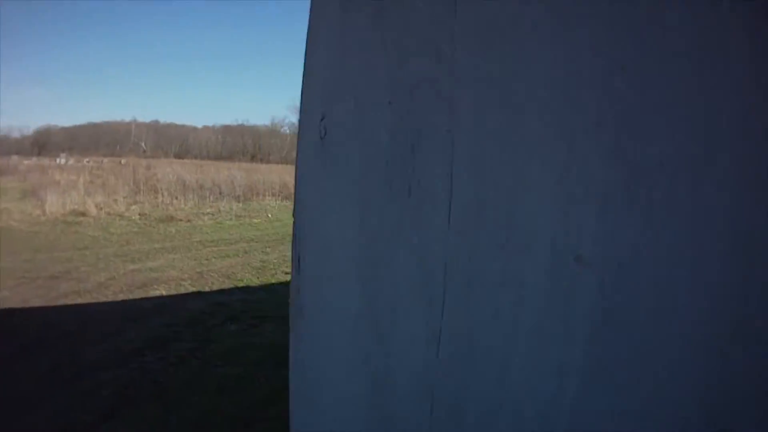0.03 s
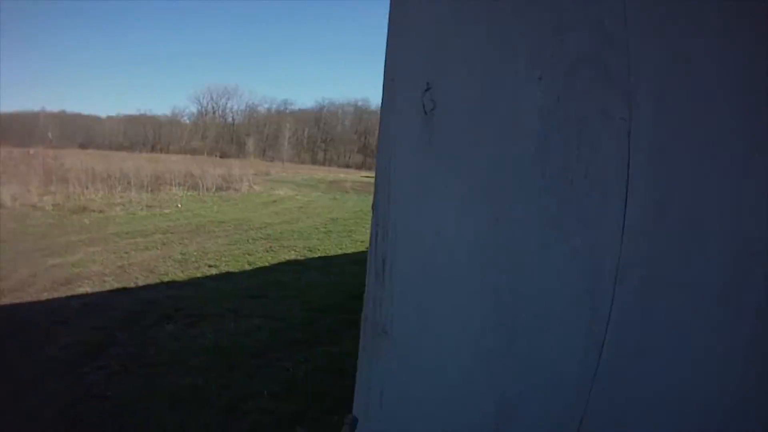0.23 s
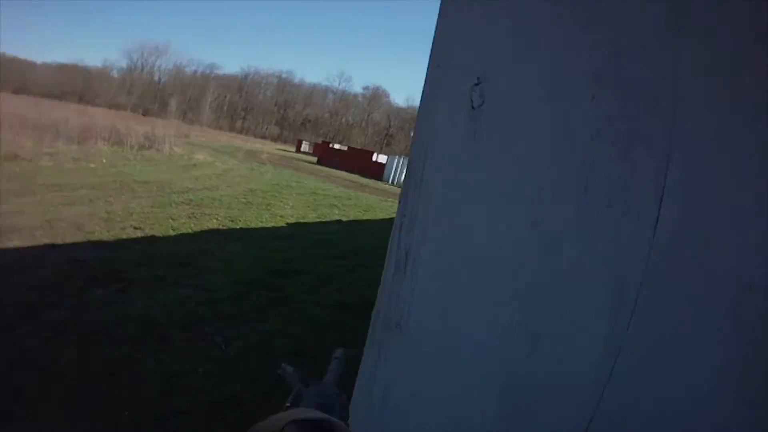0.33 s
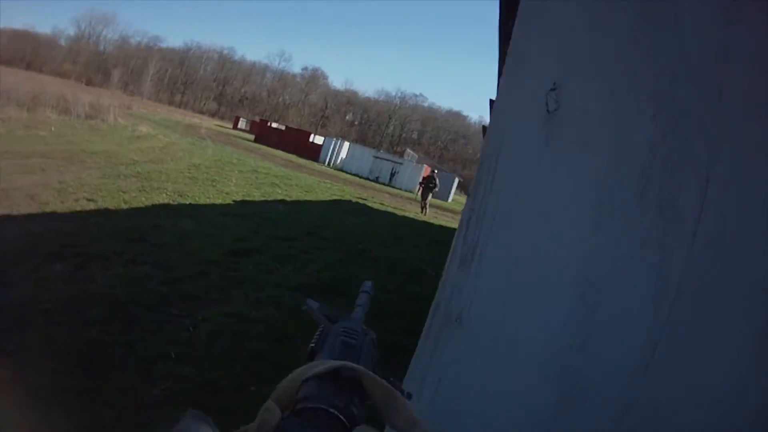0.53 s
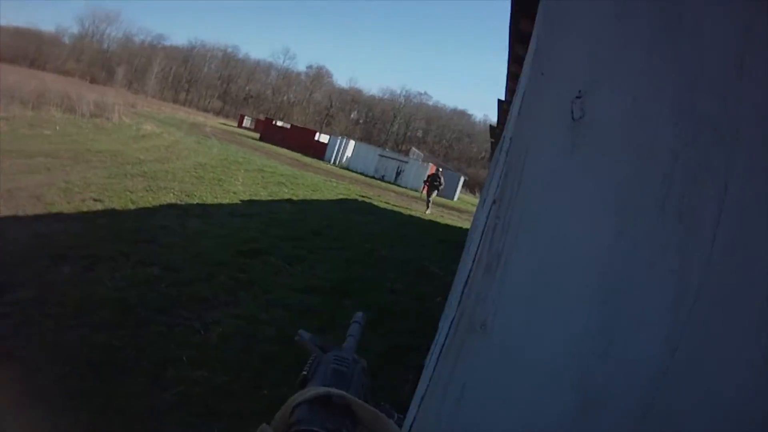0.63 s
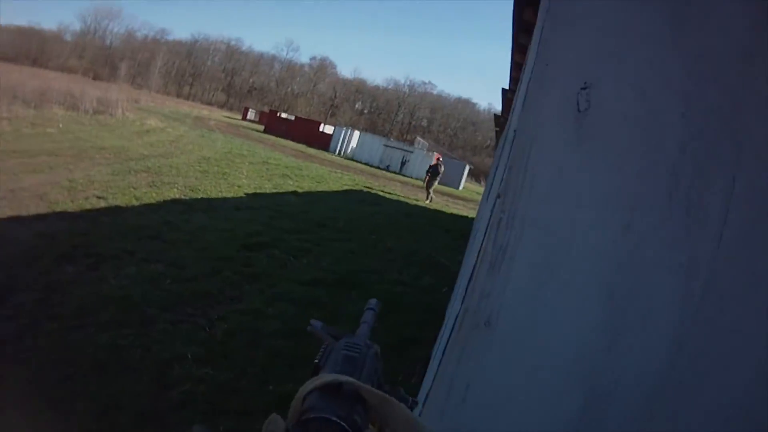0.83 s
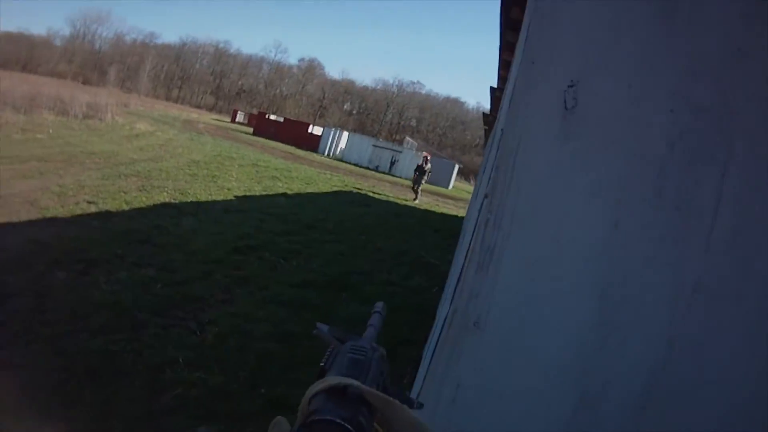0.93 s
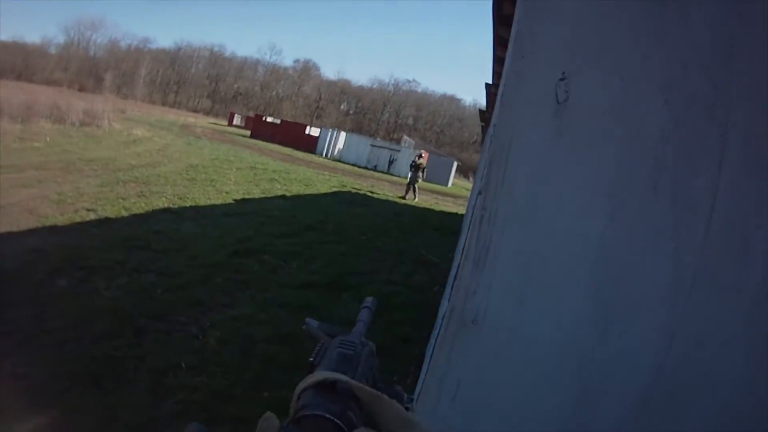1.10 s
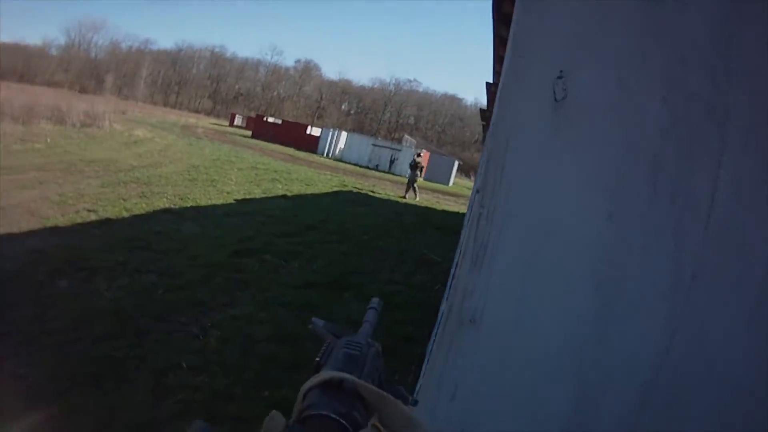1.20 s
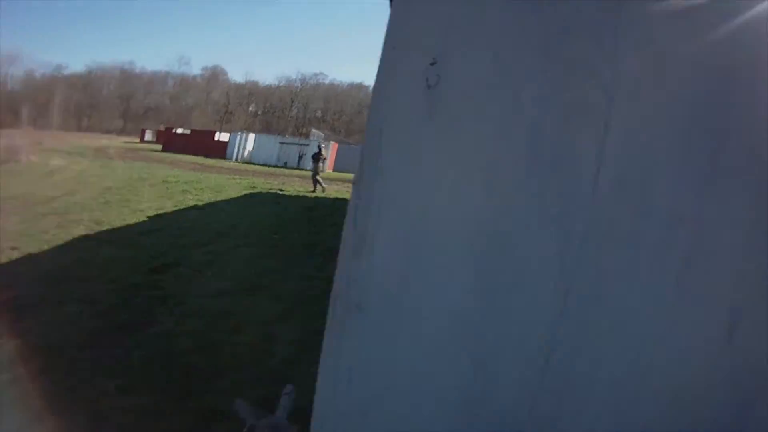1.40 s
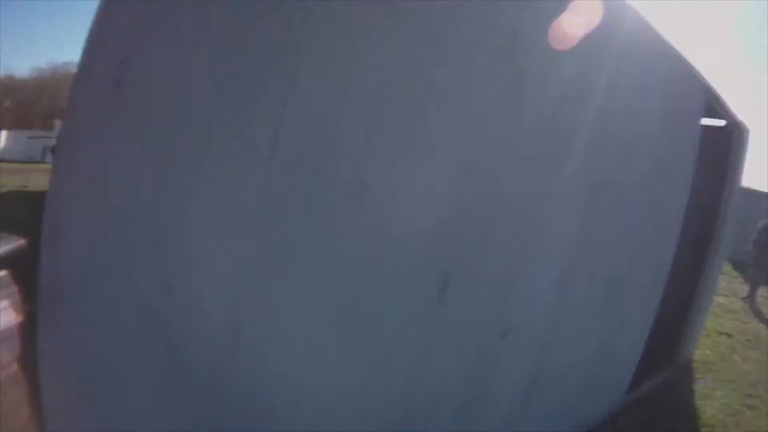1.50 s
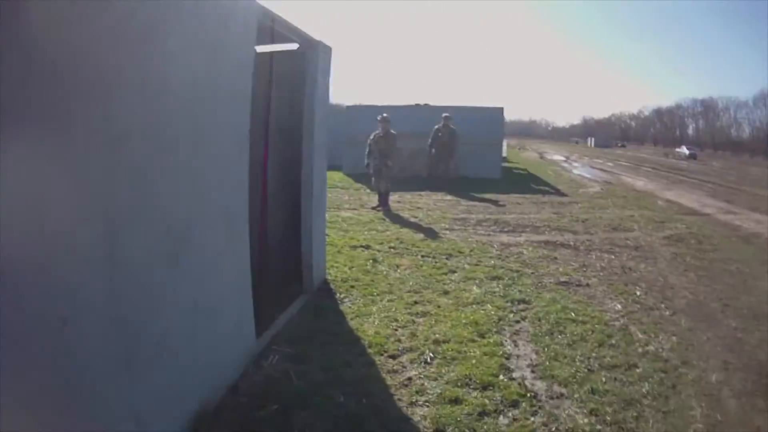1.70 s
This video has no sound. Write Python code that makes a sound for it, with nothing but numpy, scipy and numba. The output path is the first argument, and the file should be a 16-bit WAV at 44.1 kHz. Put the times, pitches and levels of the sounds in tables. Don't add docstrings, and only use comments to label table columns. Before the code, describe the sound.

Electric airsoft rifle fires six quick, even shots up close outdoors, after gear rustles and knocks

```python
import sys
import numpy as np
from scipy import signal
from scipy.io import wavfile
from scipy.ndimage import uniform_filter1d
from numba import njit

SR = 44100
rng = np.random.default_rng(int(sys.argv[2]) if len(sys.argv) > 2 else 0)


def transcribe(u):
    v = np.clip(np.atleast_2d(u).T, -1, 1)
    q = np.round(v * 32767).astype(np.int16)
    wavfile.write(sys.argv[1], SR, q)


def invert_db(x):
    u = np.asarray(x, float) / 20
    return 10 ** u


N = 77175

# motor starts t/s, gear catches t/s, nozzle clicks t/s, piston released t/s, piston slams t/s
CYCLES = [(.497, .5255, .5535, .6015, .6118), (.660, .685, .7128, .759, .7645),
          (.803, .8275, .8552, .8995, .9061), (.950, .9722, 1.0001, 1.045, 1.0513),
          (1.078, 1.1029, 1.1286, 1.171, 1.1777), (1.222, 1.2446, 1.273, 1.318, 1.3238)]
TICK_COLOUR = [-43, -54, -38, -22, -46, -1.5, -2.5, 0.5, -13, -8, -25, -17.5]


def level(x, db):
    return x * invert_db(db) / np.sqrt(np.mean(x ** 2))


@njit
def svf(x, hz, width):
    y, band, low = np.empty(len(x)), 0., 0.
    g, damping = np.tan(np.pi * hz / SR), width / hz
    for i in range(len(x)):
        v = (band + g * (x[i] - low)) / (1 + g * (g + damping))
        band, low = 2 * v - band, low + 2 * g * v
        y[i] = damping * v
    return y


def high_pass(x, order, hz):
    return signal.sosfilt(signal.butter(order, hz, "high", fs=SR, output="sos"), x)


def walk(rate):
    hold = int(SR / rate)
    steps = np.repeat(rng.standard_normal(N // hold + 1), hold)
    return 1.52 * uniform_filter1d(uniform_filter1d(steps, hold), hold)[:N]


def grit(spread_db, rate):
    x = rng.standard_normal(N) * invert_db(spread_db * walk(rate))
    return x / np.std(x)


def bursts(t, times, dbs, lengths):
    return sum(invert_db(db) * (t >= s) * np.exp(-np.abs(t - s) / length)
               for s, db, length in zip(times, dbs, lengths))


def ring(t, times, dbs, modes):
    out = np.zeros(N)
    for s, db in zip(times, dbs):
        for late, hz, mode_db, t60, push in modes:
            age = np.clip(t - s - late, 0, .2)
            decay = invert_db(db + mode_db - 60 * age / abs(t60))
            onset = 1 - np.exp(-age / abs(push))
            detuned = hz * (1 + 0.017 * rng.standard_normal())
            out += decay * onset * np.sin(2 * np.pi * detuned * age) * (age < .2)
    return out


def case(x, tone_db):
    # f/Hz, width/Hz
    resonances = [(200, 257), (560, 245), (950, 245), (1400, 356), (1950, 580), (2600, 400), (3300, 560),
                  (3950, 660), (5050, 630), (6800, 940), (8500, 1300), (11500, 7700)]
    out = 0
    for k, ((hz, width), db) in enumerate(zip(resonances, tone_db)):
        gain = (-1) ** k * invert_db(db) * np.sqrt(SR / 2 / width)
        once = svf(x, float(hz), 1.44 * width)
        out = out + gain * svf(once, float(hz), 1.44 * width)
    return out


def field():
    hush_colour = [3.5, 3.5, -10, -12, -6.5, -8, -8, -29, -18, -5, -26, -6.5]
    early = level(svf(grit(1.5, 20), 170.0, 110.0), -50) * np.exp(-(np.arange(N) / SR / .2) ** 2)
    hush = level(case(grit(3.2, 30.5), hush_colour), -46.5)
    wind = level(svf(grit(1.4, 7.6), 80.0, 78.0), -58.5)
    return early + hush + wind


def kit(t):
    # t/s, peak level/dB, length/s
    tick_events = [(0.015, -28.5, 0.0024), (0.086, -26, 0.0018), (0.0903, -31, 0.0036),
                   (0.125, -29, 0.00084), (0.192, -26, 0.0051), (0.291, -23, 0.0032), (0.954, -9, 0.0028),
                   (1.23, -13.5, 0.002), (1.397, -34, 0.0013), (1.411, -26, 0.005), (1.4608, -25, 0.0034),
                   (1.544, -31, 0.0011), (1.553, -35, .0015), (1.598, -36, 0.002), (1.6136, -33.5, 0.0023)]
    # t/s, level/dB
    rub = [(0, -47), (.05, -46), (.065, -38.5), (0.091, -53.5), (.24, -46), (0.268, -33.5), (.32, -31),
           (.40, -34), (.46, -42), (1.36, -47.5), (1.45, -45), (1.68, -46.5), (1.72, -39), (1.75, -33.5)]
    rub_colour = [-1.5, 2, -20.5, -4.5, -16, -2, -7.5, -0.5, -12, -8.5, -18.5, -15.5]
    # t/s, half length/s, f/Hz, level/dB
    squeak_events = [
        (0.313, 0.01, 2200, -32),
        (1.725, 0.012, 2300, -38.5),
        (0.605, 0.067, 240, -37),
    ]
    times, peaks, lengths = np.array(tick_events).T
    tick_noise = bursts(t, times, peaks, np.abs(lengths)) * rng.standard_normal(N)
    ticks = invert_db(-8.5) * case(tick_noise, TICK_COLOUR)
    rub_s, rub_db = np.array(rub).T
    rustle = level(case(grit(2.24, 250), rub_colour), 0) * invert_db(np.interp(t, rub_s, rub_db))
    squeaks = 0
    for s, half, hz, db in squeak_events:
        swell = invert_db(db + 3.9 * walk(300)) * np.exp(-((t - s) / half) ** 2)
        squeaks = squeaks + swell * np.sin(2 * np.pi * hz * t)
    return ticks + rustle + squeaks


def snaps(t):
    # t/s, peak level/dB, centre f/Hz, length/s
    snap_events = [(0.107, -34, 7000, .001), (.1235, -38, 9100, 0.00072), (0.1295, -34, 6440, 0.00091),
                   (0.146, -34, 6500, .001), (0.221, -49, 10500, 0.00084), (0.228, -24, 6300, 0.00063),
                   (0.239, -24.5, 6940, 0.0011), (.3375, -21, 3750, 0.00069), (.346, -16, 2970, 0.0017),
                   (0.352, -35, 9500, .0015), (0.365, -28, 7750, 0.0012), (.381, -38, 12000, .0008),
                   (0.4315, -16, 5000, 0.0011), (0.432, -33, 10070, 0.00077), (0.487, -29, 6500, 0.00068),
                   (0.526, -15, 3550, 0.001), (0.621, -19, 11700, 0.00037), (1.426, -39, 8000, 0.0011),
                   (1.4625, -41, 9900, 0.00071), (1.48, -27, 7800, 0.0014)]
    out = 0
    for s, db, hz, length in snap_events:
        crack = bursts(t, [s], [db + 1], [abs(length)]) * rng.standard_normal(N)
        out = out + svf(crack, float(hz), 0.55 * hz)
    return out


def knocks(t):
    # t/s, peak level/dB, ring f/Hz, edge level over peak/dB, ring t60/s
    bumps = [(0.2425, -7.5, 640, -18, 0.015), (0.3373, -9, 565, -2, 0.031), (.3452, -5.5, 790, -6.5, 0.011),
             (.3475, -13.5, 687, -24, 0.027), (.3525, -5, 795, -7.5, 0.011), (0.3613, -1.5, 607, -7, 0.017),
             (0.3655, -13, 840, -4, 0.021), (.3925, -24, 477, -10, 0.014), (0.4092, -3.5, 600, -13, 0.0089),
             (.4125, -12.5, 713, -14, 0.012), (.4312, -1, 758, -10.5, 0.0084), (0.4331, -3, 570, -6, 0.013),
             (.437, -24, 750, -16, 0.039)]
    bump_colour = [3, 0.5, -2, -5.5, -7, -13.5, -10.5, -41, -24, -39, -30, -42]
    rings = sum(ring(t, [s], [db + 7.5], [(0.000075, hz, 0, t60, .0016)]) for s, db, hz, _, t60 in bumps)
    times, peaks, _, sharpness, _ = np.array(bumps).T
    edge = bursts(t, times, peaks + sharpness, np.full(len(times), 0.0016)) * rng.standard_normal(N)
    return invert_db(-5.5) * case(edge, bump_colour) - rings


def slack(t):
    # t/s, peak level/dB, f/Hz
    ping_events = [(0.191, -24, 2800), (1.463, -19.5, 3780), (0.4975, -5.5, 2620), (0.5081, -3.5, 2700),
                   (0.512, -5, 3950), (.551, -4, 6950), (.5552, -12, 6960), (0.599, -8, 3900),
                   (0.6134, -2, 6880), (0.666, -4, 2630), (0.674, -9, 2680), (0.755, -7, 3970),
                   (0.828, -2.5, 3930), (0.9554, -5.5, 2700), (1.046, -18, 3880), (1.079, -13, 2570),
                   (1.1242, -7, 3200), (1.229, -11, 3870)]
    # t/s, peak level/dB, f/Hz
    thud_events = [
        (.336, -22.5, 189),
        (.346, -30.5, 150),
        (0.362, -26.5, 211),
        (0.407, -40, 121),
        (0.609, -25.5, 148),
    ]
    pings = sum(ring(t, [s], [db + 3], [(0.002, hz, 0, 0.011, 0.00084)]) for s, db, hz in ping_events)
    thuds = sum(ring(t, [s], [db], [(0.0036, hz, 0, 0.051, 0.0012)]) for s, db, hz in thud_events)
    return pings + thuds


def motor(t):
    # free mesh f/Hz, f/Hz at the click, f/Hz at release, whine level/dB, grind level/dB
    speeds = [(3442.5, 2700, 2540, -14, -23), (3442, 2760, 2560, -16, -22.5),
              (3630, 2830, 2600, -16.5, -22), (3672, 2850, 2600, -15, -22.5),
              (3914, 2930, 2620, -17.5, -22), (3532, 2850, 2600, -16, -22.5)]
    # level/dB at the catch, just after the click, at release
    loads = [(-3.5, 1, 1.5), (-3, 3.5, 1), (-6, 3, 6), (-6, -1, 6.5), (-0.5, -1, 6.5), (-8, -2, 6.5)]
    stumbles = [.001, .0015, .001, .001, .006, .0015]
    # multiple of the mesh pitch, level/dB
    overtones = [(1.2, -26), (2, -28), (3, -38)]
    grind_colour = [-21, -11, -49, -15.5, -56, 3, -10.5, 1.5, -29, -9, -17, -14.5]
    # f/Hz, width/Hz, level/dB
    gear_bands = [(8560, 870, -47.5), (10090, 380, -47.5), (11070, 870, -46.5), (13000, 750, -56),
                  (14700, 720, -66)]
    start_hz, coast_hz = 2095, 2302
    pitch, whine, hum, grind, bright, loose = [], 0, 0, 0, 0, 0
    for cycle, speed, falter, load in zip(CYCLES, speeds, stumbles, loads):
        on, catch, click, free, slam = cycle
        top, mid, low, db, grind_db = speed
        pitch += [(on, start_hz), (catch - .004, top),
                  (catch + .6 * (click - catch), top - .3 * (top - mid)),
                  (click - .003, mid), (click + 0.01202, mid),
                  (free - .012, .6 * low + .4 * mid), (free, low), (slam + .022, coast_hz)]
        gate = np.clip(np.minimum(t - catch, free - t) / 0.001, 0, 1)
        dip_db = -12 * np.exp(-((t - click - .0055) / falter) ** 2)
        load_db = np.interp(t, [catch, click - .009, click - .004, click + 0.01, free],
                            [load[0], load[0] + 2.0, 0, load[1], load[2]])
        whine = whine + gate * invert_db(db + dip_db + load_db)
        loose = loose + (t > catch) * (t < click)
        tail = invert_db(np.where(t > slam, 4 - 60 * (t - slam) / 0.12, 0))
        run = np.clip((t - on) / 0.033 + .5, 0, 1) * tail
        hum = hum + run * np.clip((t - on) / 0.016, 0, 1)
        loaded = (t > click + .008) * (t < free)
        grind = grind + run * invert_db(grind_db - 4 * loaded)
        fade = invert_db(-60 * np.maximum(t - slam, 0) / 0.095)
        bright = bright + np.clip((t - on) / (catch - on), 0, 1) * fade
    pitch_s, pitch_hz = np.array(sorted(pitch)).T
    hz = uniform_filter1d(np.interp(t, pitch_s, pitch_hz), size=200)
    hz = hz * (1 + (.004 + .004 * loose) * walk(250))
    mesh = 2 * np.pi * np.cumsum(hz) / SR
    shaft = mesh / 5

    tone = np.sin(mesh) * invert_db((1.0 + 1.2 * loose) * walk(400))
    for k, db in overtones:
        tone = tone + invert_db(db + 2.3 * (walk(87.0) + walk(430))) * np.sin(k * mesh)
    whine = whine * tone
    whine = whine + invert_db(-16) * svf(whine, 4200.0, 440.0) + 2 * svf(whine, 6330.0, 1350.0)
    hum = svf(hum * invert_db(-28 + 1.6 * walk(150)) * np.sin(shaft), 540., 210.)

    teeth = 1 + .5 * np.cos(shaft)
    gears = level(case(grind * teeth * grit(0.95, 600), grind_colour), -23.0)
    treble = high_pass(gears, 2, 5000)
    sing = 0
    for f, width, db in gear_bands:
        once = svf(grind * bright * grit(1.9, 150), float(f), float(width))
        sing = sing + level(svf(once, float(f), 1.5 * width), db)
    dulled = treble * (1 - np.clip(bright, .2, 1))
    gears = gears - svf(gears, 1810.0, 780.0) / 2 - dulled
    return sing + np.sqrt(2) * (whine + hum) + gears


def piston(t, s, db, air_db):
    # f/Hz, level/dB
    rattle_modes = [
        (3900, -1.5),
        (6850, -4.5),
    ]
    age, rattle_s = t - s, .0018
    swell = np.clip(age / rattle_s + 0.25, 0, 1.3) * (age > -.0005) * (age < rattle_s)
    rattle = sum(invert_db(db + d) * swell * np.sin(2 * np.pi * hz * age) for hz, d in rattle_modes)
    build = np.clip(age / rattle_s, 0, 1) ** 2
    leak = np.exp(-np.abs(age - rattle_s) / .0004)
    squeeze = invert_db(air_db - 6) * np.where(age < rattle_s, build, leak)
    pop = invert_db(air_db - 3) * np.exp(-((age - .0027) / .00018) ** 2)
    return rattle + squeeze - pop


def action(t):
    # start thud/dB, catch/dB, click/dB, slam/dB, air/dB
    blow_levels = [(-8, -3, 1.5, -3, -6.5), (-0.5, -11, 1.5, -4, -2), (2, -21, 0.5, -2, -2.5),
                   (1, -7.5, 1, -3, -2.5), (-4.5, -15, 2, -3, -3), (0, -8.5, 0.5, -3, -2.5)]
    crack_colour = [-10, -22.5, -19, -13.5, -20, -1, -16, 0.5, -3.5, 0, -13, -6]
    # delay/s, f/Hz, peak level/dB, t60/s, push/s
    start_modes = [(.003, 445, -10, 0.039, 0.0051)]
    click_modes = [(0.000498, 6740, -4, 0.0067, 0.00033), (.003, 3900, -8.5, .018, 0.00047),
                   (0.0025, 370, -14, 0.021, 0.00073), (0.00356, 540, -16, 0.045, 0.0011)]
    slam_modes = [(.0027, 3950, -1, .016, .0003), (.003, 6750, -10, .009, .0004),
                  (.0045, 3300, -9, .025, .0006)]
    air_modes = [(0.00069, 351, -6, 0.025, 0.00031), (0.0011, 590, -9, 0.062, 0.00057),
                 (0.00086, 1418, -11, .022, 0.00076)]
    start, catch, click, _, slam = np.array(CYCLES).T
    start_db, catch_db, click_db, slam_db, air_db = np.array(blow_levels).T
    one = np.ones(len(CYCLES))

    catch_env = bursts(t, catch, catch_db, 0.0023 * one)
    crack_env = bursts(t, click, click_db - 23, 0.0031 * one)
    crack_env = crack_env + bursts(t, click + 0.0016, click_db - 12, 0.004 * one)
    crack_env = crack_env + bursts(t, slam, slam_db - 3, 0.001 * one)
    crack_env = crack_env + bursts(t, slam + .0027, slam_db - 33, 0.00056 * one)
    crack_env = crack_env + bursts(t, slam, slam_db - 20.0, 0.013 * one)
    noise = case(catch_env * rng.standard_normal(N), TICK_COLOUR)
    noise = noise + case(crack_env * rng.standard_normal(N), crack_colour)

    rings = ring(t, start, start_db, start_modes) + ring(t, click, click_db, click_modes)
    rings = rings + ring(t, slam, slam_db, slam_modes) + ring(t, slam, air_db, air_modes)
    pistons = sum(piston(t, *row) for row in zip(slam, slam_db, air_db))
    return invert_db(-7.0) * noise + rings + pistons


def scene():
    t = np.arange(N) / SR
    blows = high_pass(action(t) + knocks(t), 3, 349)
    cracks = snaps(t)
    mid = field() + kit(t) + cracks + blows + slack(t) + motor(t)
    uneven = invert_db(7.5) * svf(blows, 1500.0, 600.) + invert_db(-0.5) * svf(blows, 4200.0, 2000.)
    uneven = uneven + invert_db(7.5) * svf(blows, 12000., 7000.)
    side = invert_db(-10.5) * cracks + invert_db(-17) * uneven * np.clip(walk(25.25), 0, 1)
    side = side + level(svf(rng.standard_normal(N), 50., 60.), -72)
    hiss = []
    for _ in "LR":
        once = svf(rng.standard_normal(N), 12600.0, 9000.)
        hiss.append(level(svf(once, 12600.0, 9000.), -66))
    return np.array([mid + side, mid - side]) + hiss


def top_cut(x):
    return signal.sosfilt(signal.butter(12, 15810, fs=SR, output="sos"), x)


def record(dry):
    rounded = .95 * dry / (1 + np.abs(dry) ** 6) ** (1 / 6)
    mix = signal.sosfilt(signal.cheby2(8, 60, 17100, fs=SR, output="sos"), rounded)
    return top_cut(mix)


dry = scene()
out = record(dry)
transcribe(out)
```